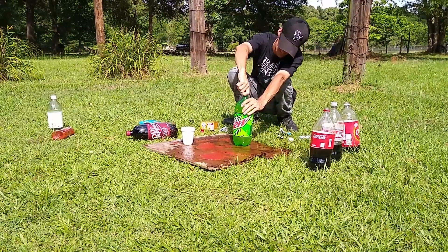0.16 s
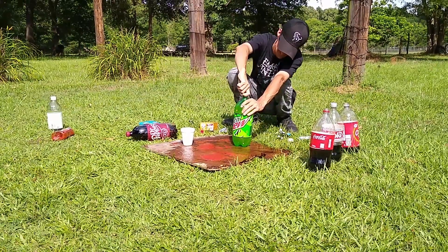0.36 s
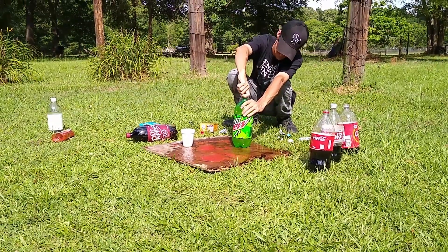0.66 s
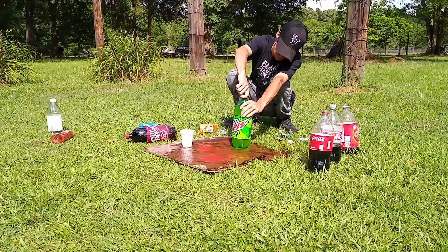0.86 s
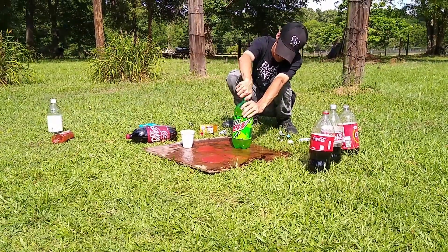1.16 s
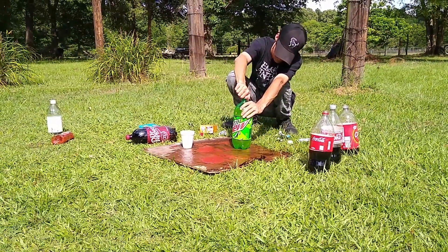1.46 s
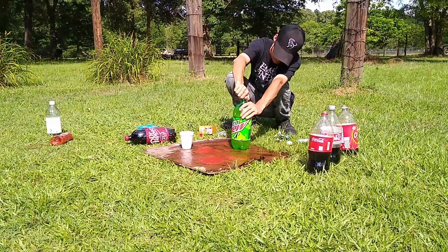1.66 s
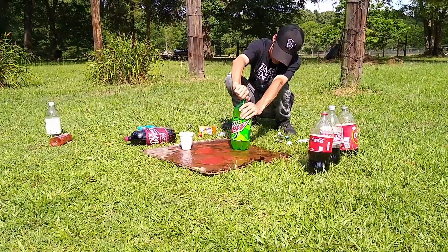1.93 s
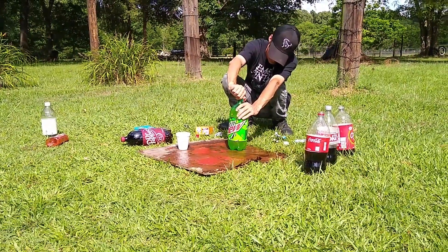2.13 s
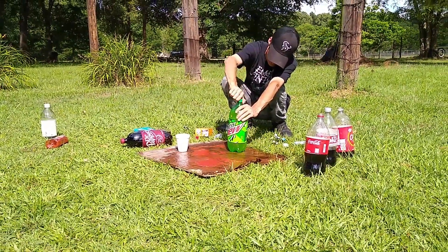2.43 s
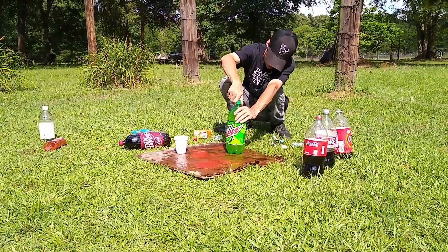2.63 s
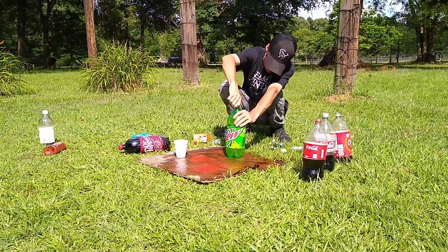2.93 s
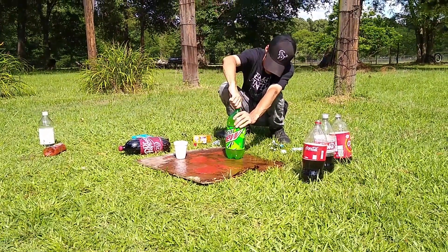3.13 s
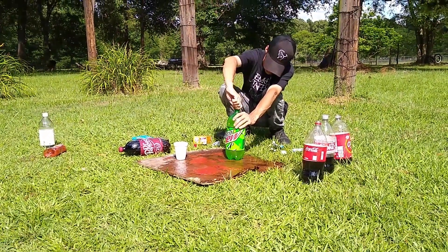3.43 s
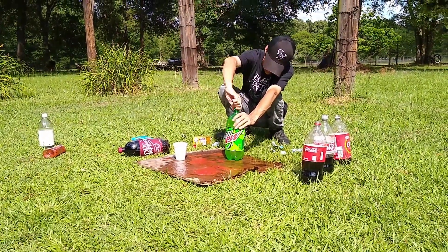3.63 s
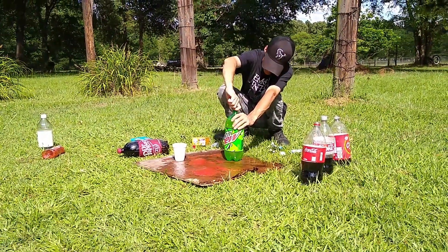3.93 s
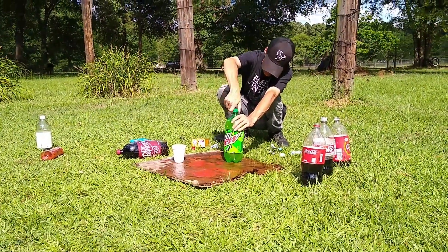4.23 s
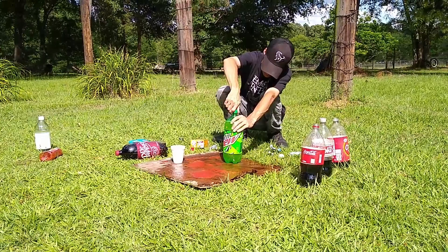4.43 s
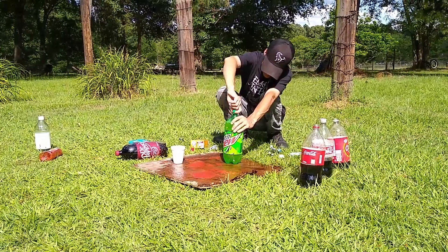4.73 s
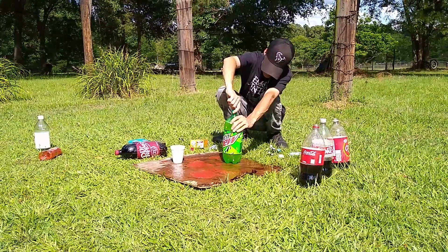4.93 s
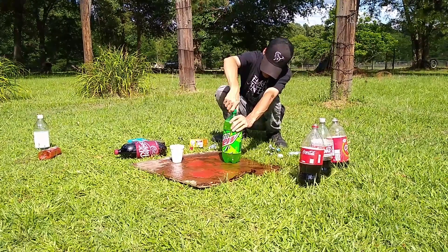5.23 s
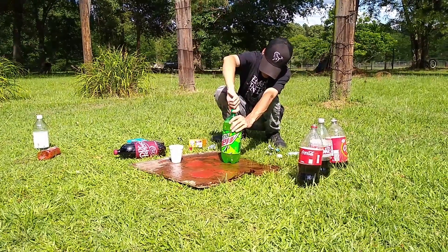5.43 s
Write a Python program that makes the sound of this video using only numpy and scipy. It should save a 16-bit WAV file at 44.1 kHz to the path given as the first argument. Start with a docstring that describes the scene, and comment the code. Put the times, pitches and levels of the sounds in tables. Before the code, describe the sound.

A soda bottle cap is slowly loosened on a lawn: thin hissing, faint whistles, a strong spurt, plastic snaps and a squealing seal, birds chirping behind.

```python
"""Gas hisses past the seal of a soda bottle eased open on a lawn, a few metres from a stereo camera.
The turbulent jet rings the cap's air spaces, the narrow gap whistles, the seal squeals like a reed,
the plastic ring cracks and the thread scrapes. A wren-like bird sings further off as gliding sines,
a nasal caller pulses, insects buzz as throbbing noise bands on the left, low noise rumbles and thuds softly.
Tree trunks and a fence return a few echoes and a short tail, made of decaying noise."""
import sys
import numpy as np
from scipy import signal
from scipy.fft import rfft, irfft, next_fast_len
from scipy.io import wavfile
from scipy.ndimage import uniform_filter1d

SR = 44100
rng = np.random.default_rng(int(sys.argv[2]) if len(sys.argv) > 2 else 0)


def int16_out(signal):
    """Quantize to a 16-bit WAV file."""
    q = np.round(np.clip(np.atleast_2d(signal).T, -1, 1) * 32767)
    wavfile.write(sys.argv[1], SR, q.astype(np.int16))


N = 245824  # samples


def undb(db):
    """Logarithmic level: decibels to amplitude gain."""
    return 10 ** (np.asarray(db) / 20)


def unit(x):
    """Power normalisation: scale to rms 1."""
    return x / np.sqrt(np.mean(x ** 2))


def decay(t, t60):
    """Exponential decay: the amplitude falls 60 dB in t60 seconds."""
    return 1000. ** (-t / t60)


def played(tables, column, rest):
    """Piecewise-linear modulation: one column of several curves over time, at rest between them."""
    t, out = np.arange(N) / SR, np.full(N, float(rest))
    for rows in map(np.array, tables):
        on = (t >= rows[0, 0]) & (t <= rows[-1, 0])
        out[on] = np.interp(t[on], rows[:, 0], rows[:, column])
    return out


def arch(start, top, end, db, edge_db, *glides):
    """Parabolic swell and fade in level over straight glides: rows (s, first glide, dB, further glides)."""
    share = np.array([0, .4, 1])
    rise = start + (top - start) * share
    fall = end - (end - top) * share[1::-1]
    s = np.r_[rise, fall]
    level = db + edge_db * (1 - np.r_[share, share[1::-1]]) ** 2
    lines = [np.interp(s, (start, end), g) for g in glides]
    further = np.transpose(lines[1:]) if lines[1:] else level
    return np.c_[s, lines[0], level, further]


def colour(x, points):
    """Linear filtering: shape x by a (frequency_hz, level_db) spectrum, interpolated over log frequency."""
    size = next_fast_len(N + SR // 10)
    hz, db = np.transpose(points)
    f = np.maximum(np.arange(size // 2 + 1) * SR / size, 1)
    gain = undb(np.interp(np.log(f), np.log(hz), db))
    return irfft(rfft(x, size) * gain, size)[..., :N]


def band(x, hz, width, order=2):
    """Band-pass filtering: keep width Hz around hz, with steep edges."""
    edges = [hz - width / 2, min(hz + width / 2, .49 * SR)]
    return signal.sosfilt(signal.butter(order, edges, "band", fs=SR, output="sos"), x)


def noise(channels=None):
    """White noise: equal power at all frequencies, rms 1, independent in each channel."""
    return rng.standard_normal(N if channels is None else (channels, N))


def walk(rate):
    """Random modulation: levels held 1 / rate s and smoothed twice, rms 1."""
    k = int(SR / rate)
    steps = np.repeat(rng.standard_normal(N // k + 1), k)
    return unit(uniform_filter1d(uniform_filter1d(steps, k), k)[:N])


def tone(hz, db):
    """Phase integration: a sine that follows pitch and rms level."""
    return np.sqrt(2) * undb(db) * np.sin(2 * np.pi * np.cumsum(hz) / SR)


def reed(tables, body, waver, scatter_db, rasp_db, count, boost_db=0., boost_hz=1., width=500.):
    """Source and filter: partials of a wavering pulse rate swell and rasp apart, then a body colours them.
    Partials near boost_hz, which may move, are lifted."""
    hz = played(tables, 1, 500)
    phase = 2 * np.pi * np.cumsum(hz * (1 + waver * walk(450))) / SR
    partials = 0
    for k in range(1, count + 1):
        lift_db = boost_db * np.exp(-((k * hz - boost_hz) / width) ** 2)
        gain = undb(scatter_db * walk(11) + rasp_db * walk(350) + lift_db)
        partials = partials + gain * np.sin(k * phase + 2 * np.pi * rng.random())
    return colour(partials * undb(played(tables, 2, -140)), body)


# spectrum of the distant hush: frequency_hz, relative density_db (per Hz)
HUSH_SPECTRUM = [(15, -30.5), (25, -6.5), (92, -10.5), (575, -23.5), (863, -21.5), (1040, -30),
                 (1610, -22.5), (2220, -17.5), (2480, -32.5), (2760, -25), (3620, -27), (8830, -25),
                 (11000, -23.5), (12500, -25), (16000, -55)]
HUSH_DB = -75  # level in a band of 9060 Hz around 4593 Hz, before its slow drift
# faint steady tone: pitch_hz, level_db
HUM = (867, -98)
# deep part of the low rumble, then two bands of its upper part:
# frequency_hz, width_hz, level between thuds_db, share of the thud_db
RUMBLE_BANDS = [(41.07, 12.3, -78.5, -1), (82, 46.7, -78, -2.5), (141.5, 53, -86, -7.5)]
# soft thuds in the rumble: peak_s, deep part_db, upper part_db (both before each band's share)
THUDS = [(0.05, -77, -74), (0.22, -72, -74.5), (0.46, -64, -65), (0.85, -70, -74), (1.33, -69, -74.5),
         (1.48, -59.5, -62.5), (1.78, -61.5, -66.5), (1.922, -60, -58.5), (2.331, -68, -73),
         (2.42, -69, -65), (2.74, -68.5, -71.5), (2.85, -62, -58), (3.068, -54.5, -54.5),
         (3.24, -72, -68.5), (3.789, -72.5, -82), (3.98, -69.5, -75), (4.22, -72, -80), (4.39, -74, -88),
         (5.05, -72, -82), (5.14, -70.5, -73), (5.36, -62.5, -72), (5.551, -67.5, -74)]
THUD_RISE_S, THUD_FALL_S = 0.05, 0.068


def air():
    """Ambient noise: distant hush, a faint hum, low rumble with soft thuds, almost alike on both ports."""
    shared = colour(noise(), [(250, 7), (700, -14.0)])  # the ports agree more at low frequencies
    hush = colour(noise(2) + shared, HUSH_SPECTRUM)
    hush = hush / np.std(band(hush, 4593, 9060)) * undb(HUSH_DB + 1.0 * walk(3.43))
    out = hush + tone(np.full(N, HUM[0]), HUM[1])
    thuds = np.array(THUDS)
    late = np.arange(N) / SR - thuds[:, :1]
    shape = np.exp(-(late / np.where(late < 0, THUD_RISE_S, THUD_FALL_S)) ** 2)
    for column, (hz, width, calm_db, share_db) in zip((1, 2, 2), RUMBLE_BANDS):
        rumble = unit(band(noise() + 0.26 * noise(2), hz, width, order=3))
        calm = undb(calm_db + 2.5 * walk(3.4))
        out = out + rumble * (calm + undb(thuds[:, column] + share_db) @ shape)
    return out


# loudness of the insects, before the left-right offset: time_s, level_db
INSECT_LEVELS = [(0.0, -71), (1.44, -64), (1.95, -72.5), (3.68, -73.5), (4.45, -73), (4.78, -74.5),
                 (5.57, -71.5)]
# their bands: frequency_hz, width_hz, relative level_db
INSECT_BANDS = [(9870, 420, -12.5), (10800, 570, -1.5), (12100, 770, -8.5), (13000, 920, -15.5)]


def insects():
    """Amplitude modulation: narrow noise bands throb together near 70 Hz, strongest on the left."""
    rate_hz = 70 * (1 + 0.04 * walk(22))
    throb = 1 + 0.17 * np.sin(2 * np.pi * np.cumsum(rate_hz) / SR)
    buzz = []
    for _ in range(2):
        bands = [unit(band(noise(), hz, w)) * undb(db + 2.0 * walk(5.96)) for hz, w, db in INSECT_BANDS]
        buzz.append(sum(bands))
    side_db = np.array([[6.5], [-12.]])
    return np.array(buzz) * throb * undb(played([INSECT_LEVELS], 1, -85) + side_db)


# syllable shapes: time from the accent_s, pitch_hz, relative level_db
RISING = [(-.125, 2483, -20), (-.11, 2487, 3), (-.095, 2473, -26), (-.08, 2662, -3.5), (-.065, 2580, -59),
          (-.06, 2065, -23.5), (-.04, 2182, -14), (-.018, 2383, -6.5), (-.003, 2580, 3), (.012, 2725, -31)]
HOOKED = [(-.07, 1970, -13), (-.055, 2010, -4), (-.03, 2079, -10.5), (-.012, 2310, 0.5), (0, 2198, -5),
          (.008, 1773, -6.5), (.018, 1650, -43)]
FALLING = [(-.008, 2780, -20), (-.002, 2724, -8.5), (.003, 2412, 1.5), (.009, 2170, 0.5), (.02, 2023, -11),
           (.03, 1985, -21)]
# notes held by the other half of the voice box, same columns
HELD_HOOKED = [(-.16, 2454, -27), (-.14, 2550, -12), (-.11, 2745, -9.5), (-.05, 2740, -17),
               (0, 2746, -21.5)]
HELD_FALLING = [(-.035, 3014, -28), (-.02, 2886, -9), (.02, 2797, -10.5), (.06, 2850, -10.5),
                (.1, 2880, -33)]
# when each syllable is sung: accent_s, level_db (added to the shape)
RISING_AT = [(0.388, -66), (.605, -61), (0.833, -64), (1.544, -64), (1.757, -62), (1.974, -64.5)]
HOOKED_AT = [(2.446, -68.5), (2.691, -66.5), (2.935, -65), (3.17, -77), (3.389, -64.5), (3.641, -65.5),
             (3.904, -66.5)]
FALLING_AT = [(4.338, -66), (4.542, -67.5), (4.736, -67.5), (4.936, -69), (5.158, -70.5), (5.369, -61)]
# lone notes of further birds: start_s, length_s, start pitch_hz, end pitch_hz, level_db
FAR_NOTES = [(0., 0.12, 3050, 3090, -73), (0.01, 0.055, 2260, 2260, -74), (1.004, 0.068, 2910, 2980, -75.5),
             (2.205, 0.1, 2276, 2350, -79), (2.759, 0.041, 3392, 3500, -73.5),
             (2.855, 0.047, 3490, 3560, -72.5), (3.53, 0.04, 942, 937, -79), (3.58, .16, 5000, 5290, -89),
             (4.44, 0.22, 3155, 3520, -86), (4.969, 0.09, 1850, 1900, -82)]
SONG_SCATTER_DB = 2.2


def sing(*pairs):
    """Superposition in time: place each syllable shape at its accents and levels."""
    return [np.array(shape) + [s, 0, db] for shape, times in pairs for s, db in times]


def songbirds():
    """Two-voiced frequency modulation: gliding sines form three syllables; further birds add lone notes."""
    sung = sing((RISING, RISING_AT), (HOOKED, HOOKED_AT), (FALLING, FALLING_AT))
    held = sing((HELD_HOOKED, HOOKED_AT), (HELD_FALLING, FALLING_AT))
    lone = []
    for s, length, first, last, db in FAR_NOTES:
        swell = [(s, first, db - 18), (s + 0.028, first, db)]
        fade = [(s + length - .02, last, db), (s + length, last, db - 31)]
        lone.append(swell + fade)
    notes = 0
    for voice, rough in ((sung, .01), (held, .02), (lone, .018)):
        hz = played(voice, 1, 2500) * (1 + rough * walk(150))
        notes = notes + tone(hz, played(voice, 2, -140) + SONG_SCATTER_DB * walk(60))
    return notes


# calls: start_s, loudest_s, end_s, first pulse rate_hz, last pulse rate_hz,
# level_db of a partial (before scatter and filters), first throat resonance_hz, last throat resonance_hz
NASAL_CALLS = [(.16, 0.235, 0.35, 395.3, 416, -71, 3520, 3430),
               (0.407, 0.584, 0.67, 436.8, 475, -66.5, 4030, 4240),
               (3.367, 3.427, 3.61, 453.7, 475.4, -75.5, 4600, 3530)]
# fixed colour of the caller: frequency_hz, level_db
NASAL_BODY = [(1000, -31.5), (1400, -23), (1900, -3), (2300, -19.5), (2800, 0), (3700, -9), (4300, -9),
              (4800, -16), (5300, -6), (6000, -42)]
NASAL_EDGE_DB = -16.5  # level at both ends, relative to the loudest
NASAL_SCATTER_DB, NASAL_RASP_DB = 2.5, 2.5


def nasal_caller():
    """Formant filtering: a pulse train's partials are lifted as a throat resonance moves past them."""
    calls = [arch(start, top, end, db, NASAL_EDGE_DB, (f0, f1), (r0, r1))
             for start, top, end, f0, f1, db, r0, r1 in NASAL_CALLS]
    throat_hz = played(calls, 3, 4000)
    return reed(calls, NASAL_BODY, 0.0072, NASAL_SCATTER_DB, NASAL_RASP_DB, count=13,
                boost_db=12.0, boost_hz=throat_hz, width=290.0)


# scattered returns of the bottle, then of all the birds: delay_s, height_db
ECHOES = [(.027, -25.5), (0.0415, -31)]
BIRD_ECHOES = [(.022, -31), (0.044, -25.5), (.07, -30)]


def yard(x, echoes, tail_db, t60, grass_db):
    """Convolution: direct sound, grass scatter, echoes and a tail, with independent scatter at each port."""
    t = np.arange(int(.5 * SR)) / SR
    tail = undb(tail_db) * decay(t, t60) * (t > .012)
    grass = undb(grass_db) * decay(t, 0.013)
    response = rng.standard_normal((2, len(t))) * (tail + grass)
    for s, db in echoes:
        smear = (t > s) * np.exp(-abs(t - s) / 0.0019)
        response += rng.standard_normal((2, len(t))) * undb(db) * smear
    response = signal.sosfilt(signal.butter(1, 7000, fs=SR, output="sos"), response)
    response[:, 0] += 1  # direct sound
    return signal.fftconvolve(x * np.ones((2, 1)), response, axes=1)[:, :N]


# shading by the camera body for sound from ahead: frequency_hz, left minus right_db
SHADE = [(500, -12), (1500, 7), (2500, 11.5), (3500, -7.5), (6500, -11), (8500, -3), (10000, 5), (12500, 7),
         (14000, 4.5), (16000, -2.5)]


def ports(x, lag):
    """Interaural differences: half the shading on each side, and the right port hears lag samples later."""
    hz, db = np.transpose(SHADE)
    left = colour(x[0], np.c_[hz, db / 2])
    right = colour(np.r_[np.zeros(lag), x[1, :-lag]], np.c_[hz, -db / 2])
    return np.array([left, right])


# hands on the bottle: start_s, frequency_hz, width_hz, peak level_db (rms at onset), t60_s
BUMPS = [(1.538, 1370, 1290, -70, 0.22), (1.773, 186, 115, -62, 0.16), (2.835, 97, 84, -65.5, 0.13)]


def bumps():
    """Damped impact: short dull noise bursts that decay exponentially."""
    t = np.arange(N) / SR
    return sum(unit(band(noise(), hz, w)) * undb(db) * (t > s) * decay(abs(t - s), t60)
               for s, hz, w, db, t60 in BUMPS)


# the thread turning round the neck: start_s, end_s, middle part start_db, middle part end_db,
# sharp part start_db, sharp part end_db
SCRAPES = [(4.232, 4.454, -90, -72, -69, -73), (5.03, 5.31, -87, -79, -80, -83),
           (5.295, 5.44, -65, -68, -66, -71)]


def scrape():
    """Stick-slip friction: noise of uneven level stands for dense tiny slips of plastic on plastic."""
    slips = noise() * undb(4.4 * walk(700) + 2.0 * walk(73))
    turns = [[(start, mid_a, sharp_a), (end, mid_b, sharp_b)]
             for start, end, mid_a, mid_b, sharp_a, sharp_b in SCRAPES]
    middle = unit(band(slips, 6000, 6000)) * undb(played(turns, 1, -140))
    sharp = unit(band(slips, 11000, 5000)) * undb(played(turns, 2, -140))
    return middle + sharp


# snaps of the cap's ring: start_s, middle part peak_db, hollow part peak_db, sharp part peak_db,
# left minus right_db (peaks are before this pan and the bass cut)
CRACKS = [(4.2285, -69, -74, -34, 5), (4.259, -21, -42.5, -26, 4.5), (4.315, -46.5, -69, -36.5, -10),
          (4.3686, -26, -76, -28, -4.5), (4.408, -40, -77, -39, 1), (5.031, -44, -71, -39.5, -1.5),
          (5.2447, -52, -73, -62, -12.5), (5.3007, -48, -69, -46, -10), (5.312, -16.5, -45.5, -21.5, 0.5),
          (5.4324, -30, -52.5, -41, 0)]
# modes of the cap: pitch_hz, relative level_db, t60_s
CAP_MODES = [(1144, -8.5, 0.045), (1304, 6.5, 0.035), (1800, 10.5, 0.025), (2450, -4, 0.041),
             (2980, -9, .02)]


def cracks():
    """Impulsive fracture and modal ringing: a sharp noise burst in two bands, plus a ring of the cap."""
    length = 1500  # samples
    t, out = np.arange(length) / SR, np.zeros((2, N + length))
    ring = sum(undb(db) * np.sin(2 * np.pi * hz * t) * decay(t, t60) for hz, db, t60 in CAP_MODES)
    for s, mid_db, hollow_db, sharp_db, pan_db in CRACKS:
        burst = rng.standard_normal(length) * (decay(t, 0.0047) + 0.54 * decay(t, 0.027))
        parts = band(burst, 6520, 6440), ring, band(burst, 11470, 4860)
        snap = sum(undb(db) * p / abs(p).max() for db, p in zip((mid_db, hollow_db, sharp_db), parts))
        i = int(s * SR)
        out[:, i:i + length] += snap * undb(np.array([[pan_db], [-pan_db]]) / 2)
    # so small a thing radiates no bass
    return signal.sosfilt(signal.butter(4, 880, "high", fs=SR, output="sos"), out[:, :N])


# the fluttering seal: time_s, flutter rate_hz, level_db of a partial (before scatter and body),
# unsteadiness (share of the rate)
SQUEAL = [
    [(5.44, 972, -64, 0.007), (5.452, 978, -49.5, 0.007), (5.467, 1001, -46.5, 0.0065),
     (5.495, 971, -45, .008), (5.52, 1000, -44.5, 0.012), (5.545, 1010, -44, 0.023),
     (5.575, 1020, -42.5, 0.02)],
]
# colour of the squeal: frequency_hz, level_db
SQUEAL_BODY = [(900, -31.5), (2000, -35), (3000, -5), (4000, -8), (5000, -3), (6000, -2.5), (7000, 1.5),
               (8000, -9.5), (9000, -6.5), (12000, -22), (15500, -40)]
SQUEAL_SCATTER_DB, SQUEAL_RASP_DB = 1.5, 3.5


def squeal():
    """Self-sustained oscillation: the seal flutters like a reed and sounds a harmonic series."""
    return reed(SQUEAL, SQUEAL_BODY, played(SQUEAL, 3, 0), SQUEAL_SCATTER_DB, SQUEAL_RASP_DB, count=15)


# the nearly shut gap: loudest_s, swell_s, fade_s, start pitch_hz, end pitch_hz, peak level_db (before flutter)
WHISTLES = [(1.73, 0.032, .07, 5450, 5560, -52.5), (1.899, 0.11, 0.24, 5900, 5930, -55),
            (1.979, 0.095, 0.047, 6110, 6110, -56.5), (3.62, 0.21, 0.28, 5920, 6160, -68)]
WHISTLE_EDGE_DB = -26.5  # level at both ends, relative to the peak


def whistles():
    """Aeroacoustic tones: near-pure sines whose pitch and level are roughened by the flow."""
    out = 0
    for s, swell, fade, first, last, db in WHISTLES:
        curve = [arch(s - swell, s, s + fade, db, WHISTLE_EDGE_DB, (first, last))]
        hz = played(curve, 1, 6000) * (1 + 0.0044 * walk(250))
        out = out + tone(hz, played(curve, 2, -140) + 4.1 * walk(90))
    return out


# gas past the seal, one curve for each release: time_s, jet level_db, opening of the gap (0-1)
GAS = [
    [(0.0, -56.5, 0.18), (0.1, -54.5, 0.31), (0.17, -50, 0.34), (0.38, -53, 0.19), (0.6, -54.5, 0.02),
     (0.73, -57.5, .0), (0.9, -60, 0.2), (1.0, -57.5, .35), (1.2, -60.5, 0.29), (1.43, -61.5, 0.2),
     (1.53, -52, 0.39), (1.68, -50.5, 0.47), (1.73, -49.5, .6), (1.77, -48, 0.95), (1.85, -46, 0.89),
     (1.91, -52.5, 0.81), (1.96, -61.5, 0.64), (2.07, -87, 0.5)],
    [(2.92, -97, 0.5), (2.95, -72, 0.7), (2.962, -58, 0.8), (2.984, -52, 0.67), (3.01, -43, 0.84),
     (3.16, -36, 0.98), (3.2, -47, 1), (3.294, -76, 0.55), (3.36, -87, 0.6)],
    [(5.435, -72, .1), (5.45, -59, 0), (5.51, -49, 1), (5.575, -49, .5)],
]
# spectrum of the jet: frequency_hz, relative density_db (per Hz)
JET_SPECTRUM = [(6500, -34.5), (7400, -12), (9000, -3.5), (10500, -2.5), (12000, 2), (13500, -1),
                (15300, 1), (15800, -37), (16500, -43)]
# thread groove, neck, wide-open roar and its low edge: frequency_hz, width_hz,
# level over the jet_db when nearly shut, half open and wide open, flicker_db
AIR_SPACES = [(6757, 650, -4.5, -9, -10, 0.53), (4590, 335, -37.5, -11, -14.5, 3.1),
              (6300, 5700, -26.5, -24, -1.5, 0.98), (2830, 310, -28, -40, -18.5, 3.6)]


def spray():
    """Partial coherence: a wide source gives the ports common noise plus noise of their own."""
    return noise() + 1.02 * noise(2)


def gas():
    """Turbulence and resonance: a spitting, foamy jet rings the cap's air spaces as the gap opens."""
    jet = colour(spray() * undb(1.1 * walk(900) + 1.0 * walk(24.87)), JET_SPECTRUM)
    out = jet / np.std(band(jet, 9810, 5870))
    opening = played(GAS, 2, 0)
    for hz, width, *db, flicker_db in AIR_SPACES:
        level_db = np.interp(opening, (0, .5, 1), db) + flicker_db * walk(14)
        out = out + unit(band(spray(), hz, width, order=4)) * undb(level_db)
    return out * undb(played(GAS, 1, -140))


def scene():
    """Superposition: the bottle ahead, the birds further off to the right, and the surroundings."""
    birds = songbirds() + nasal_caller()
    far = yard(birds, BIRD_ECHOES, tail_db=-26.5, t60=0.34, grass_db=-14.5) * undb([[-3.5], [3.5]])
    bottle = scrape() + cracks() + squeal() + whistles() + gas()
    near = ports(yard(bottle, ECHOES, tail_db=-38, t60=0.29, grass_db=-24.5), lag=10)
    return air() + insects() + far + bumps() + near


TOP_HZ = 16400


def record(dry):
    """Band limiting: the camera cuts the top with a steep elliptic low-pass."""
    return signal.sosfilt(signal.ellip(10, .2, 70, TOP_HZ, fs=SR, output="sos"), dry)


dry = scene()
out = record(dry)
int16_out(out)
```